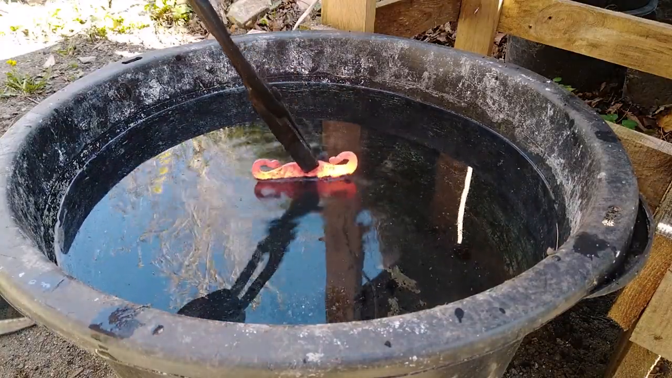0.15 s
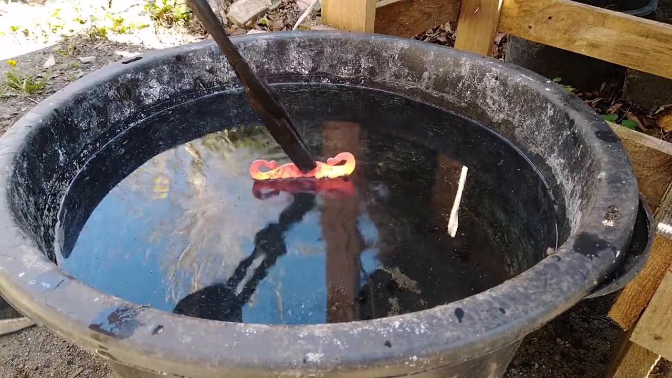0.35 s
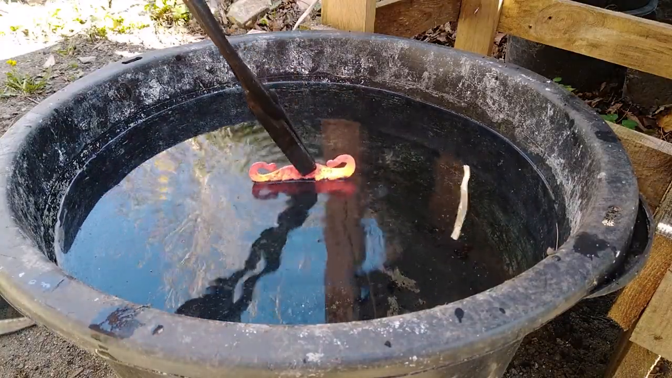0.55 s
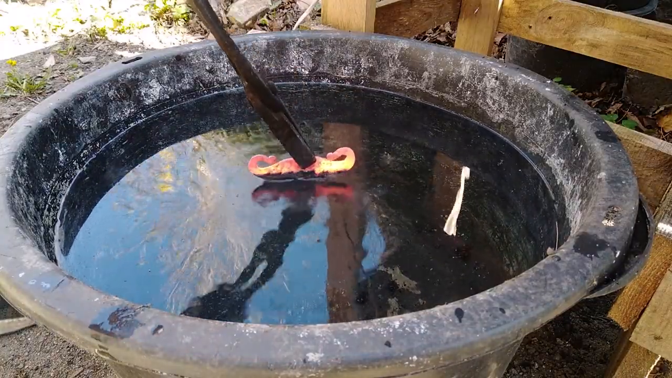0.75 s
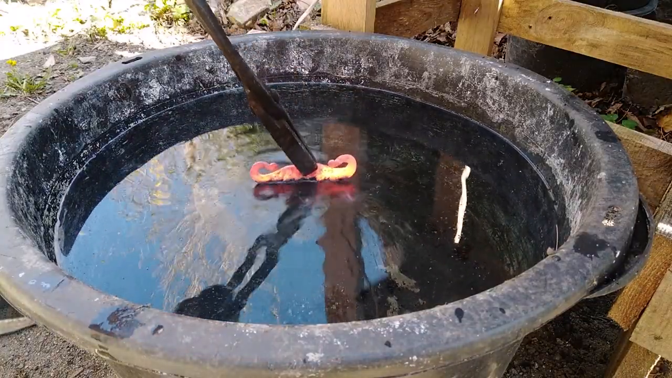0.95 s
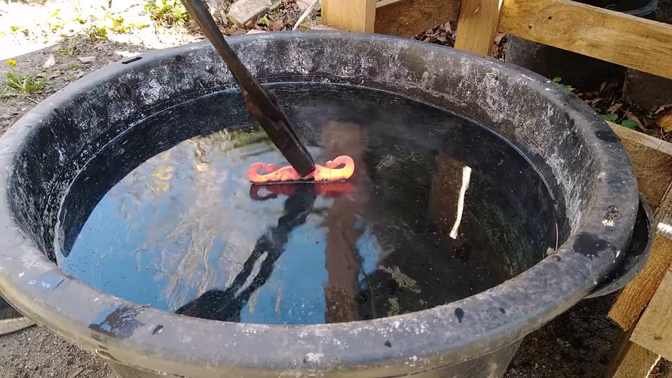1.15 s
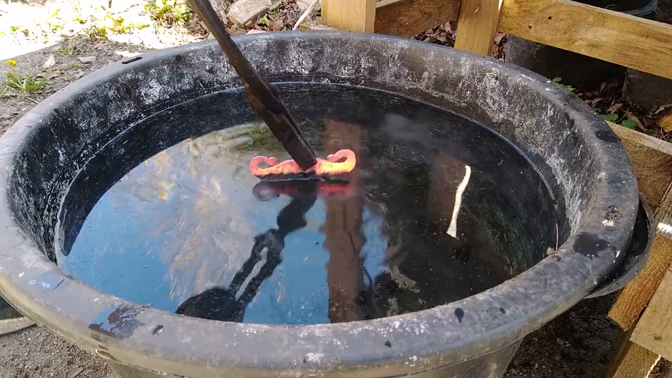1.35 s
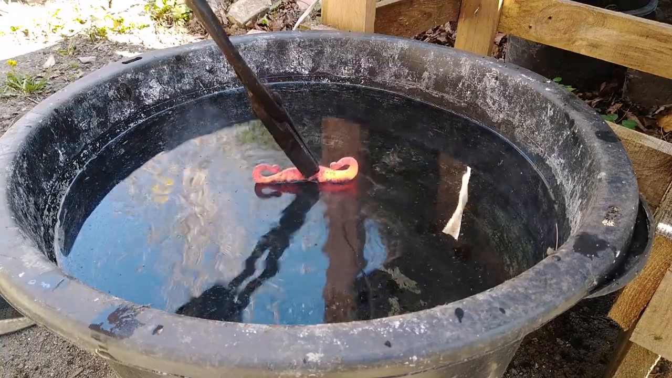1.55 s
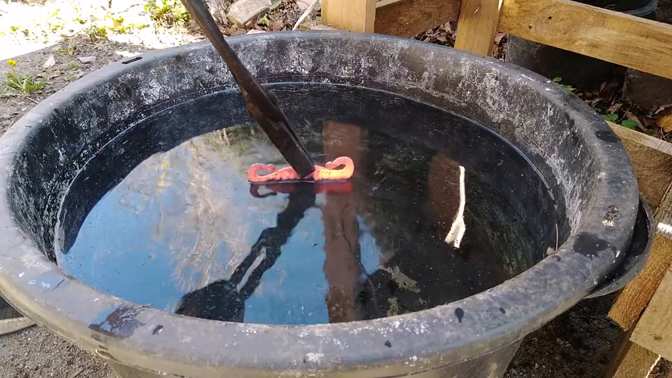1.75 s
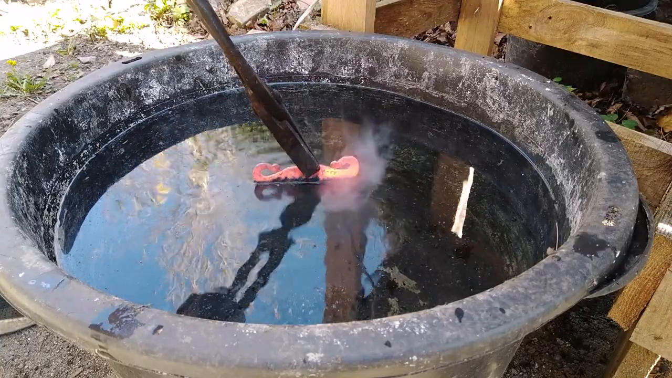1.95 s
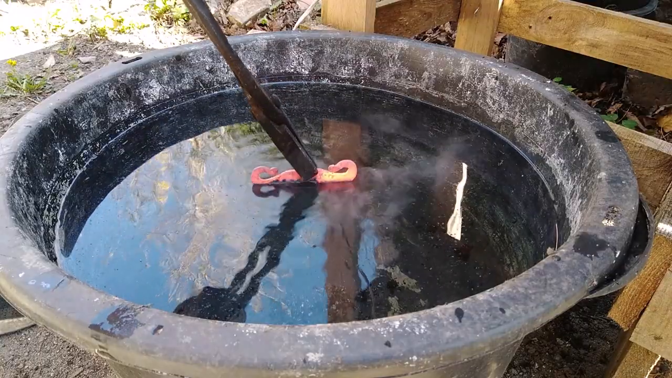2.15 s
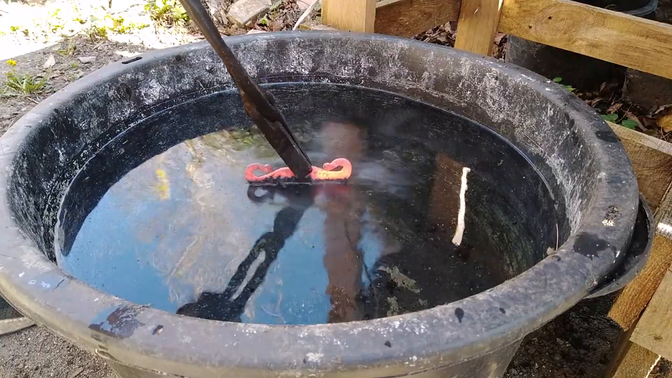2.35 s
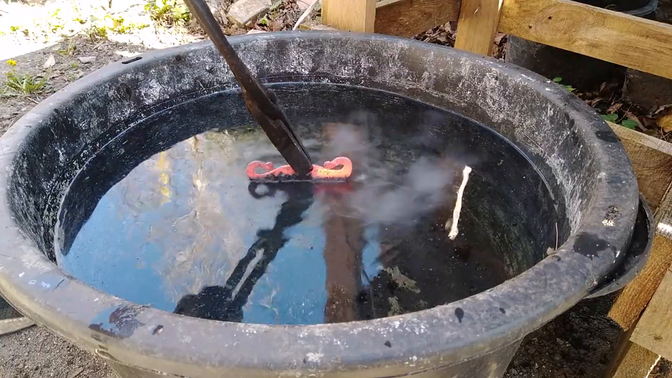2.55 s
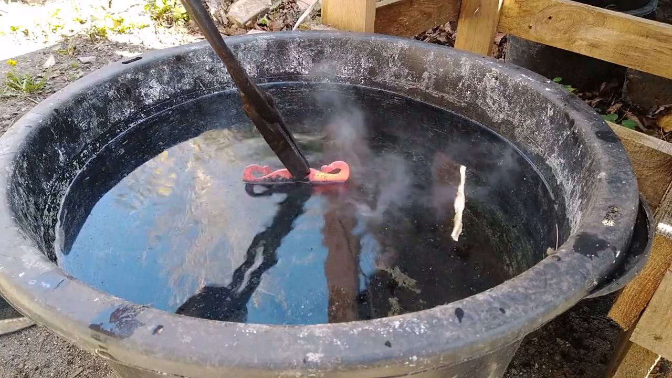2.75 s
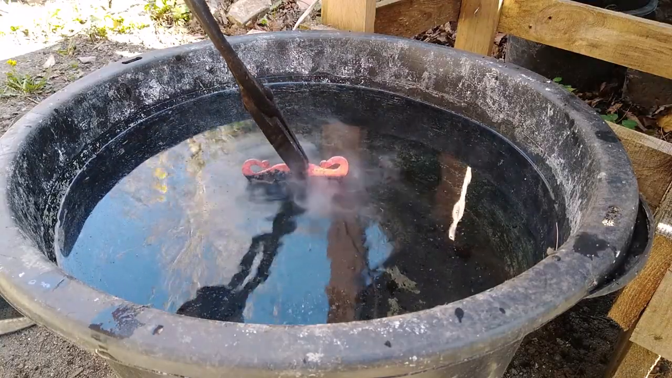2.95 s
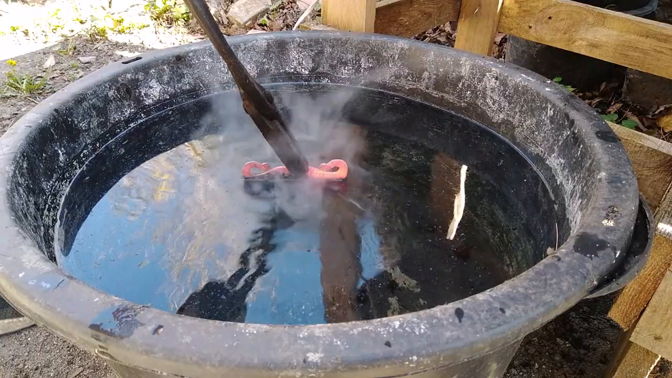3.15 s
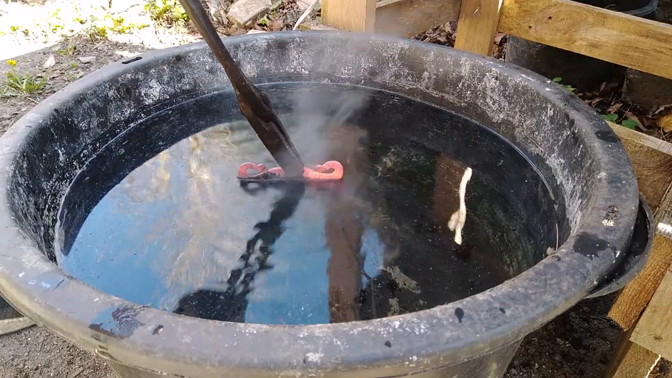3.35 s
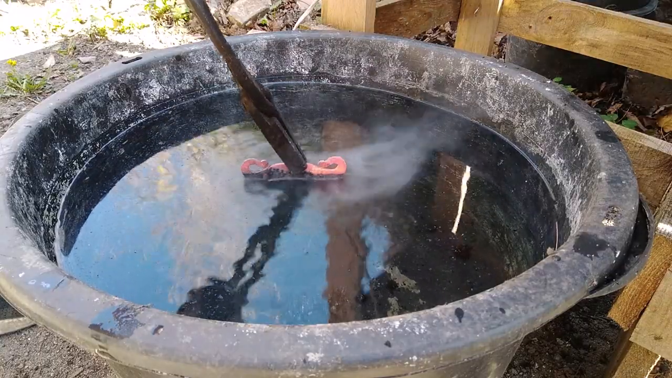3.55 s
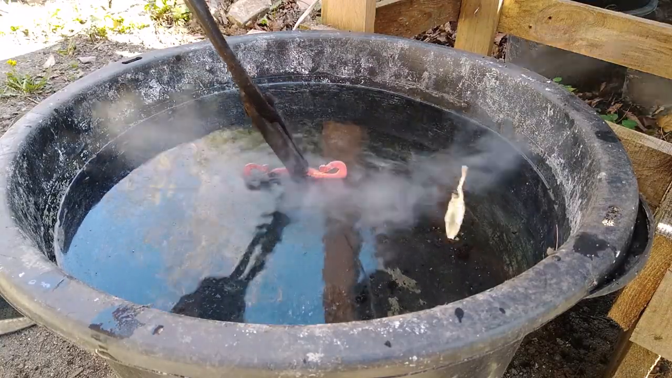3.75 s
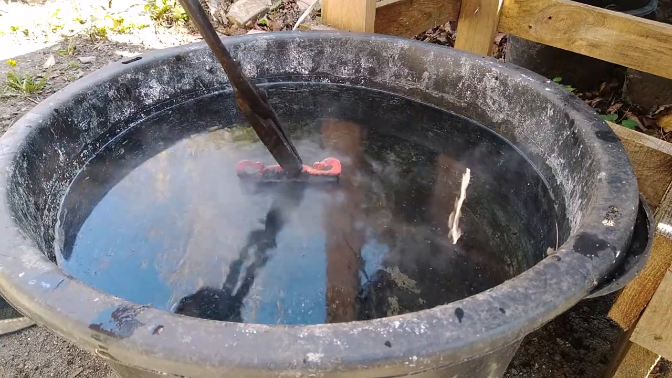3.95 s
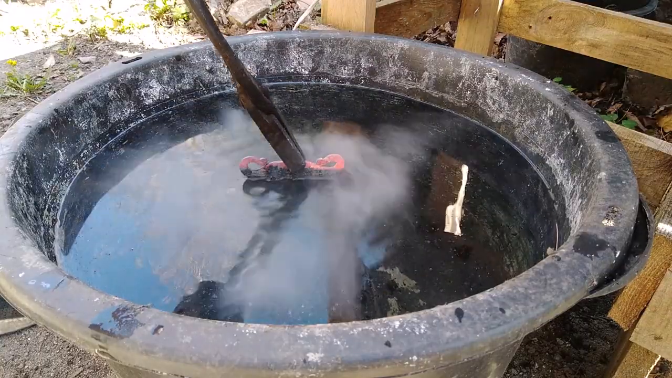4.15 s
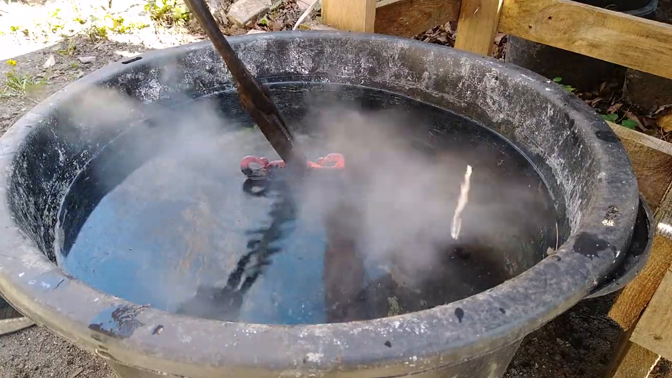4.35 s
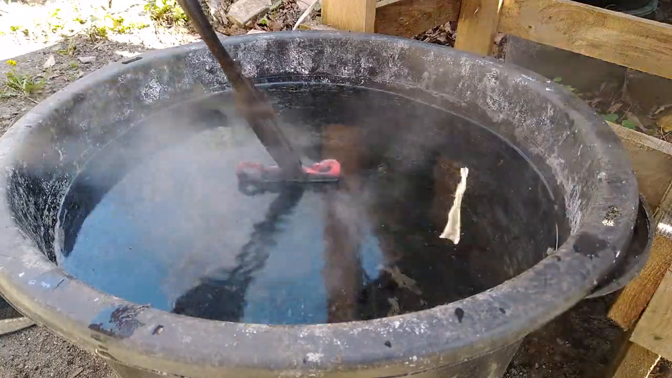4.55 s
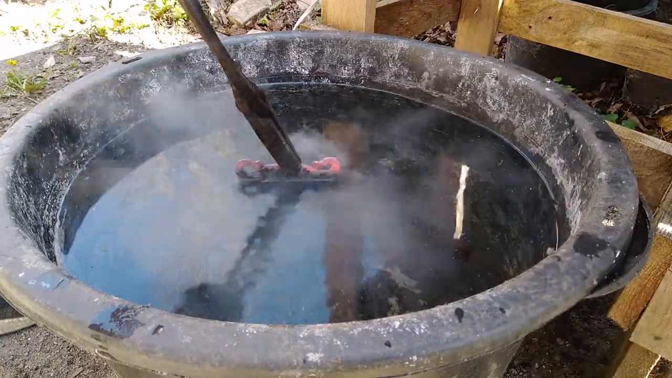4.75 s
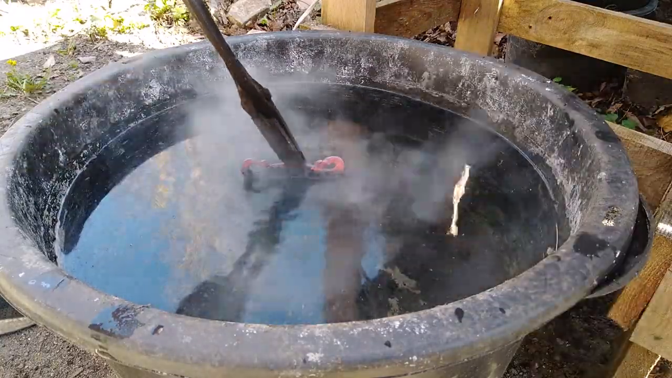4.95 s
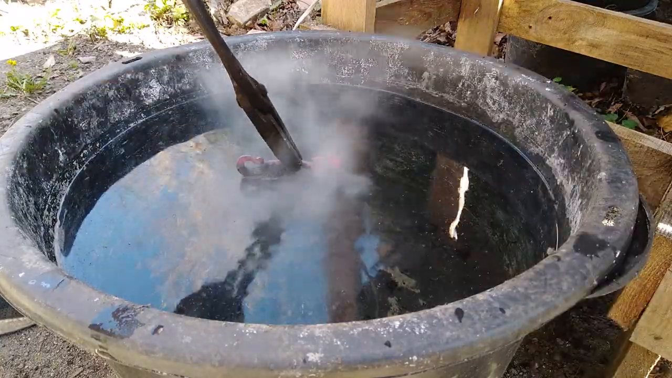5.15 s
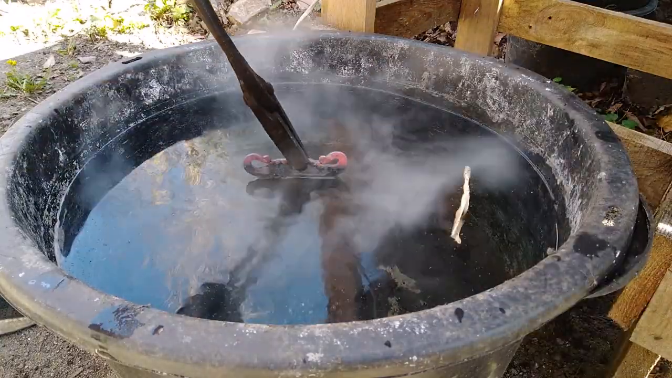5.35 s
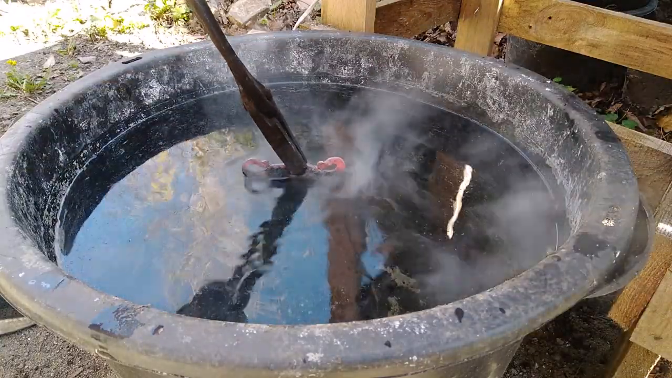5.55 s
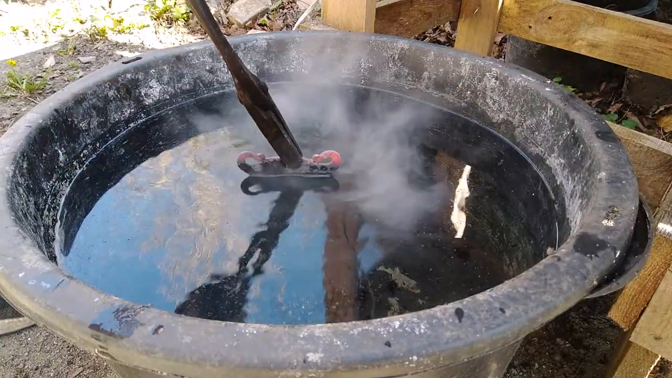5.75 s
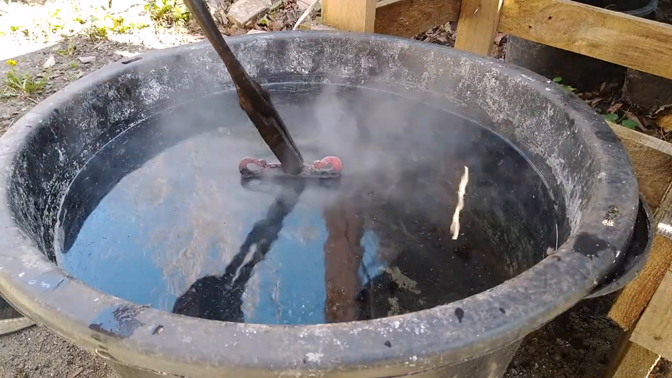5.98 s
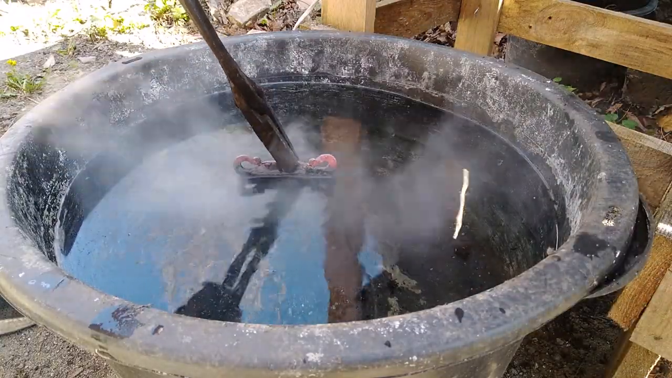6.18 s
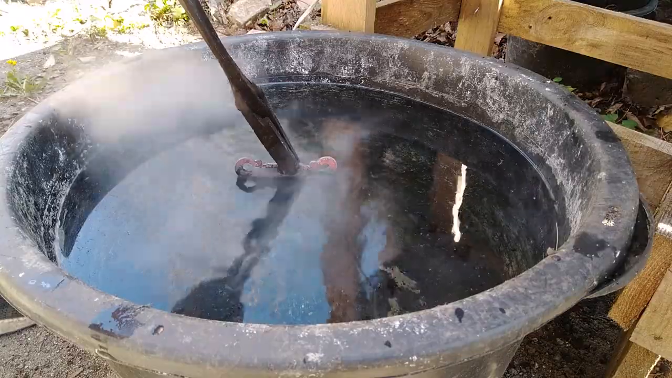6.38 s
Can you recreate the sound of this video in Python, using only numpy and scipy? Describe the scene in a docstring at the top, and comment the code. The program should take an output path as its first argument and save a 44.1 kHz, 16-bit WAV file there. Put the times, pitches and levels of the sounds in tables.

```python
"""Red-hot steel at the surface of a tub of water, outdoors: water flashes to steam on it in surges.
The sizzle is two layers of random clicks, coarse spit and fine fizz, over a softer simmer of larger bubbles;
resonances and weak echoes of the tub colour all three.
Wind buffets the microphone, mostly its right port: shaped noise in gusts, plus single pressure bumps.
Behind lie a distant outdoor rumble (noise) and a far machine's hum (two sines) that slowly fades."""
import sys
import numpy as np
from scipy.fft import rfft, irfft, next_fast_len
from scipy.io import wavfile

SR = 44100
rng = np.random.default_rng(int(sys.argv[2]) if len(sys.argv) > 2 else 0)


def generate_wav(sig):
    """Save sig (samples, or channels by samples) to the path in sys.argv[1] as 16-bit PCM at SR."""
    pcm = np.round(np.clip(np.atleast_2d(sig).T, -1, 1) * 32767).astype(np.int16)
    wavfile.write(sys.argv[1], SR, pcm)


N = 282945
TIME = np.arange(N) / SR

# single eddies that hit a port: (arrival [s], peak level [dB], turnover [Hz], left-right [dB])
EDDIES = [(2.156, -21.5, 96.9, -28), (2.459, -19.5, 142, -18), (2.492, -21, 132, -14),
          (2.625, -25.5, 110, -19), (2.68, -18.5, 113, -23), (2.748, -17.5, 101, -18),
          (2.779, -21, 107, -9), (2.981, -31, 96, -13), (3.015, -28, 98, -25), (3.149, -21, 95, -30),
          (3.326, -18, 92.5, -33), (3.723, -21, 109, -11.0), (3.773, -19, 96, 1), (3.85, -25, 188, -23),
          (3.978, -17, 160, 15), (4.096, -20, 148, -20), (4.18, -21.5, 98, -24), (4.591, -27, 95.5, -14),
          (4.953, -32, 134.6, -10), (4.997, -19.5, 96.9, -30), (5.056, -22.5, 96, -19),
          (5.395, -26, 103, -11), (5.485, -22, 121, -15), (5.544, -16, 100, -24), (5.814, -19, 120, -26),
          (5.983, -24.5, 119, -14), (6.327, -20, 147, -21), (6.346, -16, 130, -25)]
EDDY_RISE_S = 0.0069   # from arrival to peak
COARSE_LAG_S = 0.02    # a surge starts with fizz; spit and larger bubbles follow


def sizzle(bursts_per_s=14000, spread_db=2.5, sputter_db=0.65, spit_flicker_db=0.5, fizz_flicker_db=0.12):
    """The vapour film breaks and reforms; harder boiling makes more bursts, and the whole hiss sputters."""
    # steady boiling on the steel, as fizz ahead of the tub: (time [s], level [dB])
    boil = [(0, -42.5), (1, -46), (1.6, -41.5), (2.7, -38.5), (3.8, -38), (4.4, -43), (5.3, -42.5),
            (6.42, -44)]
    # colour of coarse spit: (frequency [Hz], density [dB per Hz])
    spit_spectrum = [(1300, -25), (1650, -8), (1900, -4.5), (2600, 0.5), (3500, -1), (4800, -1.5),
                     (6000, 0.5), (8000, -24), (12000, -26)]
    # colour of fine fizz: (frequency [Hz], density [dB per Hz])
    fizz_spectrum = [(3000, -15.5), (5000, -8), (6500, -2), (10000, 0.5), (16000, -1.5)]
    # spit relative to fizz, in steady boiling and in a surge; it dies down as the steel cools
    spit_steady_db, spit_surge_db, spit_fall_db_per_s = -3.5, -6, 0.12

    steady_db, = in_time(boil)
    fizz_db = summed_db(from_db(steady_db), surging(0))
    spit_surge = from_db(spit_surge_db) * surging(COARSE_LAG_S)
    spit_db = summed_db(from_db(steady_db + spit_steady_db), spit_surge)
    spit_db = spit_db - spit_fall_db_per_s * TIME

    spit_per_s = bursts_per_s * from_db(fizz_db - fizz_db.max())
    fizz_per_s = 2 * spit_per_s
    spit = at_ports(bursts(spit_per_s, spread_db), spit_spectrum)
    spit = spit * from_db(spit_db + spit_flicker_db * drift(57))
    fizz = at_ports(bursts(fizz_per_s, spread_db), fizz_spectrum)
    fizz = fizz * from_db(fizz_db + fizz_flicker_db * drift(50))
    return from_db(sputter_db * drift(23)) * (spit + fizz)


def surging(lag_s, attack_s=0.15, release_s=0.15):
    """Water closes in on the steel and flashes to steam: surge gain at every sample, delayed by lag_s."""
    # surges of steam, as fizz ahead of the tub: (start [s], time until it lets go [s], level [dB])
    surges = [(-0.031, 0.32, -41.5), (0.523, 0.2, -41), (1.102, 0.245, -41.5), (1.651, 0.311, -38.6),
              (2.117, 0.26, -40.5), (2.292, 0.243, -36.5), (2.777, 0.14, -32), (2.885, 0.28, -38),
              (3.317, 0.32, -33.3), (3.842, 0.19, -34.5), (3.995, 0.31, -38.2), (4.345, 0.44, -34.5),
              (4.736, 0.38, -36), (5.362, 0.26, -35), (5.834, 0.29, -35.5), (6.284, 0.16, -33.5)]
    gains = [from_db(db) * envelope(start_s + lag_s, length_s, attack_s, release_s)
             for start_s, length_s, db in surges]
    return from_db(summed_db(*gains))


def simmer(bursts_per_s=3000, spread_db=1.0, flicker_db=1.0, surge_db=-16, trim_db=-0.5):
    """Larger bubbles ring in the hollow between water and rim; each surge stirs up more."""
    # larger bubbles between surges, ahead of trim and tub: (time [s], level [dB])
    steady = [(0.0, -47), (0.45, -48), (0.92, -53), (1.5, -53.5), (1.85, -48.5), (2.5, -45), (3.0, -48),
              (3.35, -45.5), (3.92, -44.5), (4.27, -53.5), (5.1, -51), (5.36, -57), (6.42, -54.5)]
    # colour of the larger bubbles: (frequency [Hz], density [dB per Hz])
    water_spectrum = [(200, -27), (280, -5), (350, -3), (450, -5.5), (680, -5), (1000, -3), (1400, -2),
                      (1700, -5), (2000, -2), (3500, -29)]
    steady_db, = in_time(steady)
    stirred = from_db(surge_db) * surging(COARSE_LAG_S)   # surge_db is relative to the surge's fizz
    level_db = summed_db(from_db(steady_db), stirred) + trim_db
    bubbles = at_ports(bursts(bursts_per_s, spread_db), water_spectrum)
    return bubbles * from_db(level_db + flicker_db * drift(22))


def bursts(per_s, spread_db):
    """Three unrelated trains of collapsing bubbles: many small ones, a few large."""
    born = rng.random((3, N)) < per_s / SR
    sizes = from_db(spread_db * np.minimum(rng.exponential(1, (3, N)), 4))
    clicks = born * sizes * rng.choice([-1, 1], (3, N))
    clicks = clicks / np.sqrt(np.minimum(per_s, SR))   # level independent of rate
    return clicks / np.std(clicks)


def at_ports(trains, spectrum, right_lead_s=0.0001):
    """One train arrives directly, first at the nearer right port; tub and yard scatter the others."""
    # left-right likeness of sound from the tub: (frequency [Hz], likeness [0-1])
    likeness = [(200, 0.97), (800, 0.44), (1170, 0.77), (1500, 0.52), (2000, 0.67), (4000, 0.58),
                (7500, 0.48), (9500, 0.16), (16000, 0.07)]
    # resonance of the left port: (frequency [Hz], gain [dB])
    left_port = [(1200, -2.5), (2200, -1), (2700, 3.5), (4000, 0), (6000, 0), (6800, 6), (7400, 10),
                 (8100, 5.5), (9200, -6.5), (10200, -10.5), (11500, -17), (14000, -10), (15700, -13.5)]
    # resonance of the right port: (frequency [Hz], gain [dB])
    right_port = [(1200, -1), (2000, 1.5), (2700, 0.5), (4000, 1), (6000, -1), (8000, 1), (9100, -1),
                  (9900, 2.5), (10500, 6), (11100, 1.5), (12000, -3.5), (13000, -8.5), (16000, -9)]
    delays_s = right_lead_s * np.array([[1], [0]])

    def alike(hz):
        return np.clip(at_hz(likeness, hz), 0, 1)

    def direct_path(hz):
        return np.sqrt(alike(hz)) * np.exp(-2j * np.pi * hz * delays_s)

    direct = filtered(trains[0], direct_path)
    scattered = filtered(trains[1:], lambda hz: np.sqrt(1 - alike(hz)))
    left, right = coloured(direct + scattered, spectrum)
    return rms_one(np.array([coloured(left, left_port), coloured(right, right_port)]))


def in_tub(x):
    """The tub lifts and cancels narrow bands; weak echoes off rim and walls differ at the two ports."""
    # tub resonances: (centre [Hz], full width at half the dB [Hz], gain [dB])
    resonances = [(270, 38, -30), (813, 107, -14.5), (1064, 39, -8), (1145, 183, 5.5), (1565, 210, -2),
                  (1910, 124, 2), (2400, 160, -2), (2900, 110, -1.5), (3166, 110, -4.5), (3430, 360, 2),
                  (4230, 590, 3), (4720, 110, 3), (5740, 200, -1)]
    # echoes: (delay [s], left gain [ratio], right gain [ratio])
    reflections = [(.00138, 0.037, -0.0078), (.00254, -0.042, -0.074), (.00306, -.07, -.03),
                   (.0034, .06, .03), (.0042, 0.072, 0.091), (0.0118, .08, -0.034), (0.0161, -0.1, 0.058)]

    def colour(hz):
        return from_db(sum(db * 0.5 ** ((2 * (hz - centre_hz) / width_hz) ** 2)
                           for centre_hz, width_hz, db in resonances))

    def echoes(hz):
        return 1 + sum(np.outer(gains, np.exp(-2j * np.pi * hz * delay_s))
                       for delay_s, *gains in reflections)

    return filtered(x, lambda hz: colour(hz) * echoes(hz))


def wind(flutter_trim_db=-1.0, lumpy_db=2.5, ragged_db=4.0, calm_db=-46, swept_db=-9, swept_s=0.012):
    """Each port has its own turbulence: rumble in any breeze, flutter when a gust tears on its edge."""
    # colour of the rumble: (frequency [Hz], gain [dB])
    rumble_spectrum = [(10, -5.5), (30, 2.5), (70, 0), (115, -9), (160, -15.5), (300, -41), (700, -66)]
    # colour of the flutter: (frequency [Hz], gain [dB])
    flutter_spectrum = [(60, -22), (120, -1), (170, 1.5), (250, -6), (400, -19), (700, -38.5), (1500, -58)]
    low_db, high_db = airflow()
    rumble = rms_one(coloured(rng.standard_normal((2, N)), rumble_spectrum))
    rumble = rumble * from_db(low_db + lumpy_db * drift(23.9))
    flutter = rms_one(coloured(rng.standard_normal((2, N)), flutter_spectrum))
    flutter = flutter * from_db(high_db + flutter_trim_db + ragged_db * drift(39))
    # near 0 when the stronger port's flutter is well below calm_db
    tearing = 1 / (1 + from_db(calm_db - high_db.max(axis=0)) ** 2)
    # an eddy sweeps the rumble off the ports while it passes
    passing = sum(np.exp(-((TIME - s - EDDY_RISE_S) / swept_s) ** 2) for s, *_ in EDDIES)
    return rumble * from_db(swept_db * passing) + tearing * flutter


def airflow():
    """Rumble and flutter levels in dB at each port: gust power added to the breeze."""
    # light breeze between gusts: (time [s], rumble level [dB])
    light_air = [(0, -50), (1.3, -52), (2.5, -40.5), (4.8, -43.5), (6.42, -39)]
    # gusts: (start [s], length [s], rumble level [dB], flutter level before wind()'s trim and gating [dB],
    # left-right of the rumble [dB])
    gusts = [(0.06, .33, -46.5, -61, -6), (1.604, 0.034, -35.5, -52, -10), (1.936, 0.22, -44, -56, -22),
             (2.141, 0.021, -33, -31.5, -21), (2.267, .17, -41, -45.5, -20), (2.515, 0.13, -30, -42.5, -8),
             (2.676, .10, -33, -38, -6), (2.868, 0.029, -32.5, -41, -11), (2.961, 0.065, -24.5, -47.5, -16),
             (3.089, 0.079, -25.5, -37.5, -22), (3.29, .04, -30, -47, -20), (3.415, 0.029, -30.5, -48, -13),
             (3.633, 0.076, -32, -50, -20), (3.699, 0.2, -31, -37.5, -14), (3.961, 0.04, -35, -33.5, 2),
             (4.039, 0.076, -29, -37, -12), (4.159, 0.14, -31, -38.5, -12), (4.313, 0.15, -41.5, -49, 3),
             (4.477, 0.14, -35.5, -45.5, -13), (4.897, .15, -33.5, -53, -16),
             (5.324, 0.092, -34.5, -39, -8.5), (5.448, 0.11, -28, -35, -13), (5.638, .055, -34.5, -46, -19),
             (5.779, 0.21, -30.5, -40, -17), (6.069, 0.21, -31.5, -41, -17), (6.311, .14, -31.5, -37, -23)]
    attack_s, release_s = 0.016, 0.047
    breeze_flutter_db, breeze_pan_db = -14, -4.5   # flutter relative to rumble; left-right
    # flutter grows faster with wind speed than rumble, so its left-right dB are larger by this factor
    flutter_one_sided = 1.55

    breeze_db, = in_time(light_air)
    breeze = from_db(breeze_db) * panned(breeze_pan_db)
    rumble_power = breeze ** 2
    flutter_power = (from_db(breeze_flutter_db) * breeze) ** 2
    for start_s, length_s, rumble_db, flutter_db, pan_db in gusts:
        gust = envelope(start_s, length_s, attack_s, release_s)
        rumble_power += (from_db(rumble_db) * panned(pan_db) * gust) ** 2
        flutter_power += (from_db(flutter_db) * panned(flutter_one_sided * pan_db) * gust) ** 2
    return 10 * np.log10(rumble_power), 10 * np.log10(flutter_power)


def eddies(lull=0.45, lull_width=1.74, tear_db=-13.5, tear_s=0.005, tear_hz=310):
    """An eddy is a bump of pressure inside a wider lull; quicker ones tear harder on the port's edge."""
    out = np.zeros((2, N))
    flutter = rms_one(filtered(rng.standard_normal(N),
                               lambda hz: hz / tear_hz / (1 + (hz / tear_hz) ** 4)))
    quickest_hz = max(hz for _, _, hz, _ in EDDIES)
    for arrival_s, peak_db, hz, pan_db in EDDIES:
        near = np.abs(TIME - arrival_s) < 0.06
        t = TIME[near] - arrival_s - EDDY_RISE_S
        turn = np.pi * hz * t
        bump = np.exp(-turn ** 2)
        wide = np.exp(-(turn / lull_width) ** 2)
        swing = (bump - lull * wide) / (1 - lull)
        tear = from_db(tear_db) * hz / quickest_hz * flutter[near] * np.exp(-(t / tear_s) ** 2)
        sides = from_db([[pan_db / 2], [-pan_db / 2]])
        out[:, near] += from_db(peak_db) * (swing + tear) * sides / sides.mean()
    return out


def yard(air_db=-53, apart=0.44, waver_db=2.0, wander_hz=0.65, fade_db_per_s=1.5):
    """Distant rumble as noise partly shared by the ports; a machine's wavering hum with its octave."""
    # colour of the outdoor rumble: (frequency [Hz], density [dB per Hz])
    air_spectrum = [(20, -21), (70, -0.5), (130, -3.5), (200, -3), (270, -14), (350, -11), (600, -12),
                    (800, -15.5), (2000, -30), (16000, -58)]
    hum_hz, hum_start_db, octave_start_db = 177.8, -55.5, -70
    noise = rng.standard_normal(N) + apart * rng.standard_normal((2, N))
    air = from_db(air_db) * rms_one(coloured(noise, air_spectrum))
    phase = 2 * np.pi * np.cumsum(hum_hz + wander_hz * drift(4.9)) / SR
    tones = from_db(hum_start_db) * np.sin(phase) + from_db(octave_start_db) * np.sin(2 * phase)
    hum = np.sqrt(2) * tones   # levels are rms
    return air + hum * from_db(waver_db * drift(4.9) - fade_db_per_s * TIME)


def from_db(db):
    """Decibels to gain."""
    return 10 ** (np.asarray(db) / 20)


def summed_db(*gains):
    """Level of unrelated sounds heard together."""
    return 10 * np.log10(sum(gain ** 2 for gain in gains) + 1e-20)


def rms_one(x):
    """Scale so that the mean of the channels has rms 1."""
    return x / np.sqrt(np.mean(np.atleast_2d(x).mean(axis=0) ** 2) + 1e-20)


def panned(pan_db):
    """Left and right gains for a left-right dB, at constant total power."""
    sides = from_db(pan_db * np.array([[0.5], [-0.5]]))
    return sides / np.sqrt(np.mean(sides ** 2))


def envelope(start_s, length_s, attack_s, release_s):
    """Linear rise, hold until the length is over, linear fall."""
    rise = (TIME - start_s) / attack_s
    fall = 1 - (TIME - start_s - length_s) / release_s
    return np.clip(np.minimum(rise, fall), 0, 1)


def in_time(rows):
    """Columns of a time table, interpolated at every sample."""
    s, *columns = np.transpose(rows)
    return [np.interp(TIME, s, column) for column in columns]


def at_hz(points, hz):
    """Read a frequency table on a log-frequency axis."""
    known_hz, values = np.transpose(points)
    return np.interp(np.log(hz + 1e-6), np.log(known_hz), values)


def filtered(x, response):
    """Apply a gain that is a function of frequency."""
    size = next_fast_len(N + 4096)   # padding keeps tails from wrapping round
    return irfft(rfft(x, size) * response(np.fft.rfftfreq(size, 1 / SR)), size)[..., :N]


def coloured(x, spectrum):
    """Give a signal the colour of a (Hz, dB) table."""
    return filtered(x, lambda hz: from_db(at_hz(spectrum, hz)))


def drift(rate_hz):
    """Low-passed noise of rms 1, weak above rate_hz."""
    return rms_one(filtered(rng.standard_normal(N), lambda hz: 1 / (1 + (hz / rate_hz) ** 2)))


def scene():
    """The quench in its tub, the wind and the yard."""
    quench = in_tub(sizzle() + simmer())
    return quench + wind() + eddies() + yard()


def record(dry, cutoff_hz=15830, slope_hz=100):
    """Cut the top steeply: gain falls linearly from 1 to 0 across slope_hz."""
    return filtered(dry, lambda hz: np.clip((cutoff_hz - hz) / slope_hz + 0.5, 0, 1))


dry = scene()
out = record(dry)
generate_wav(out)
```